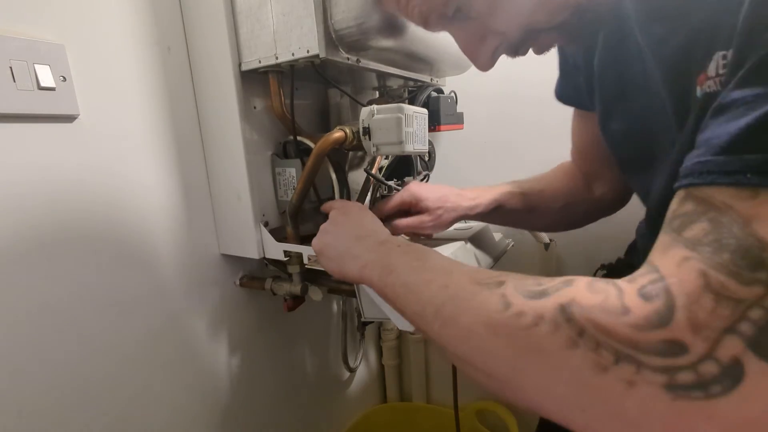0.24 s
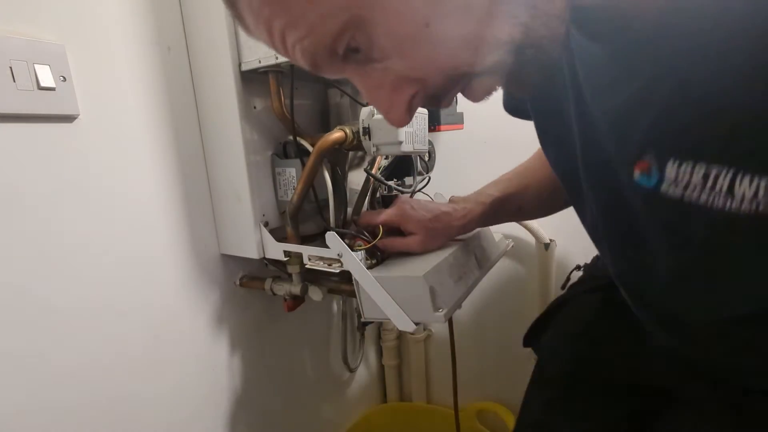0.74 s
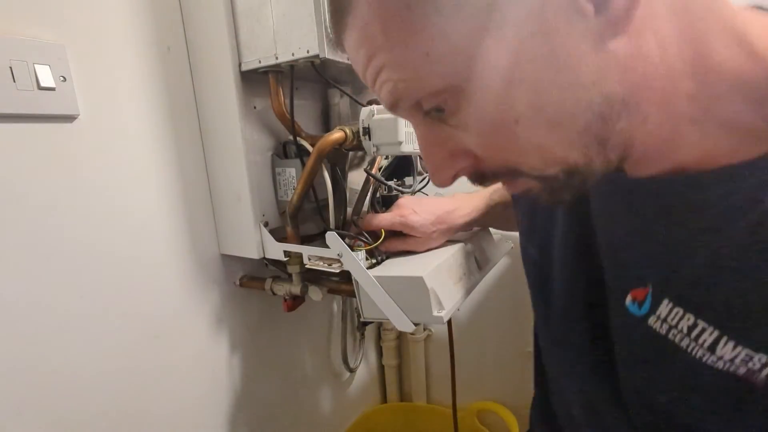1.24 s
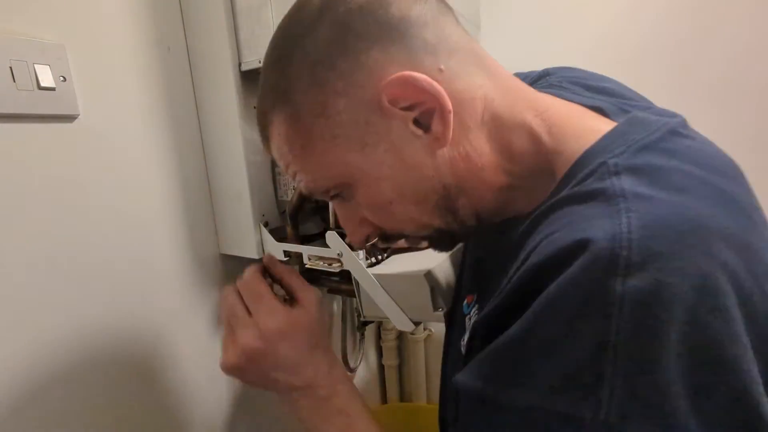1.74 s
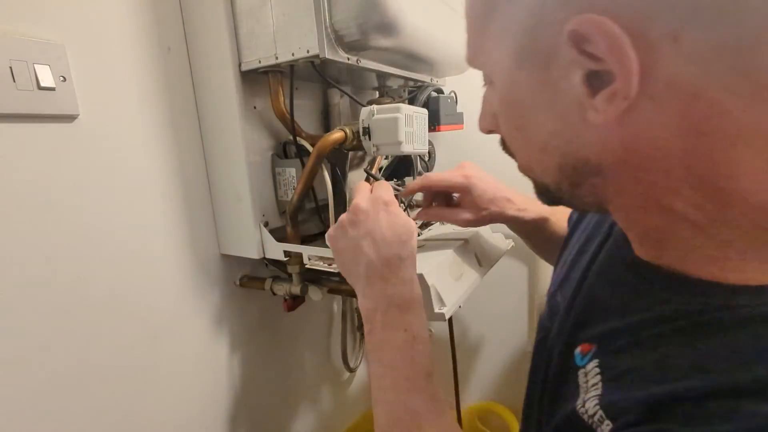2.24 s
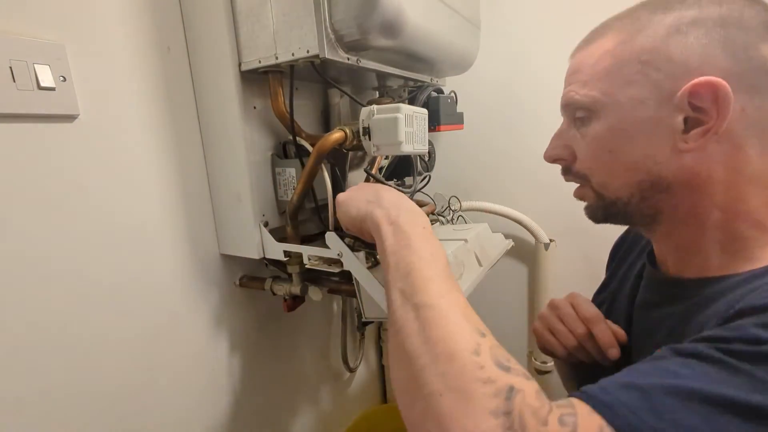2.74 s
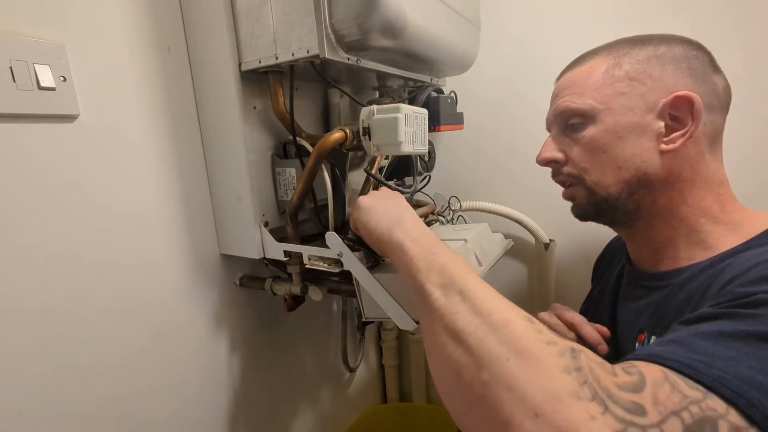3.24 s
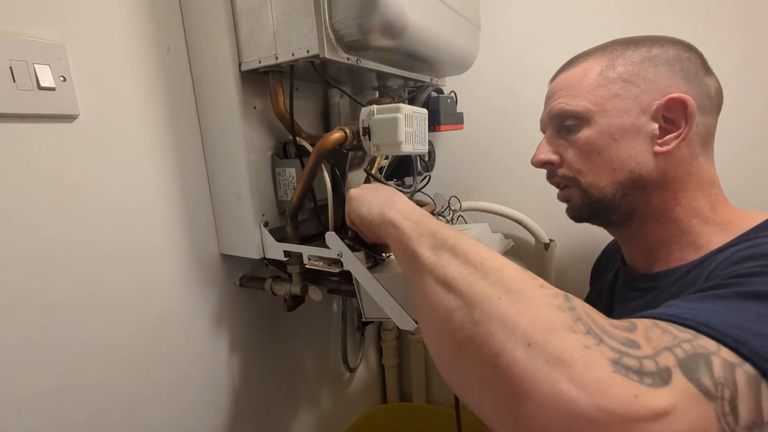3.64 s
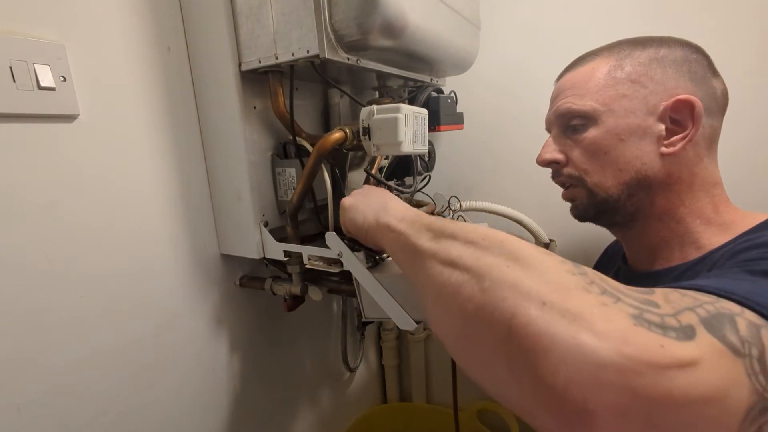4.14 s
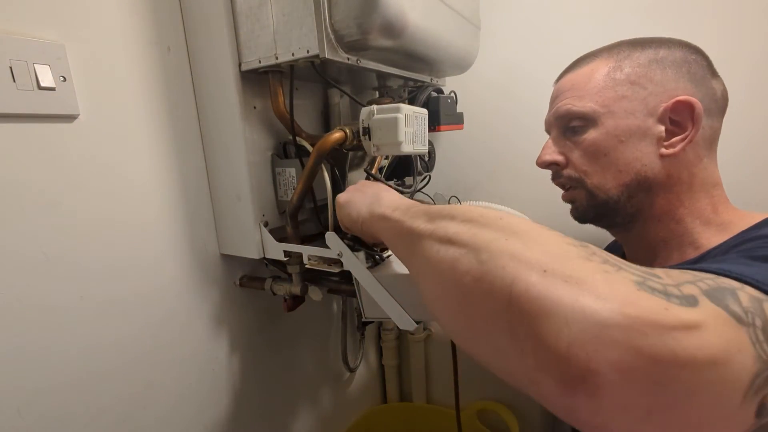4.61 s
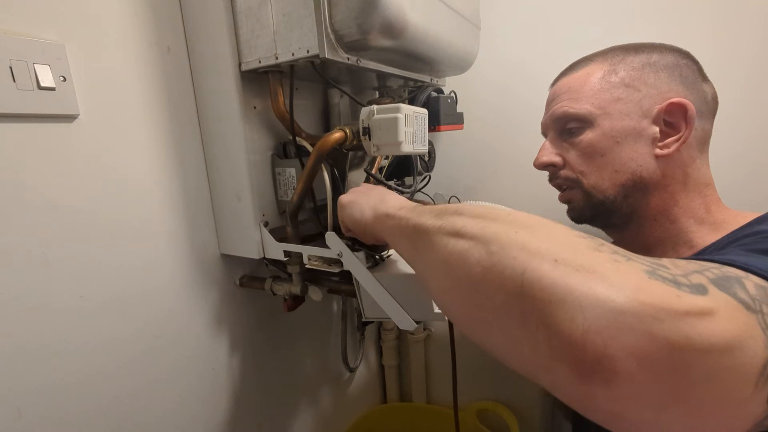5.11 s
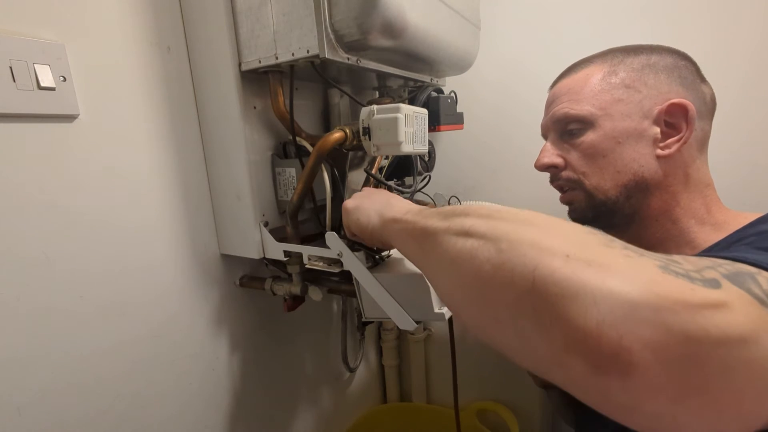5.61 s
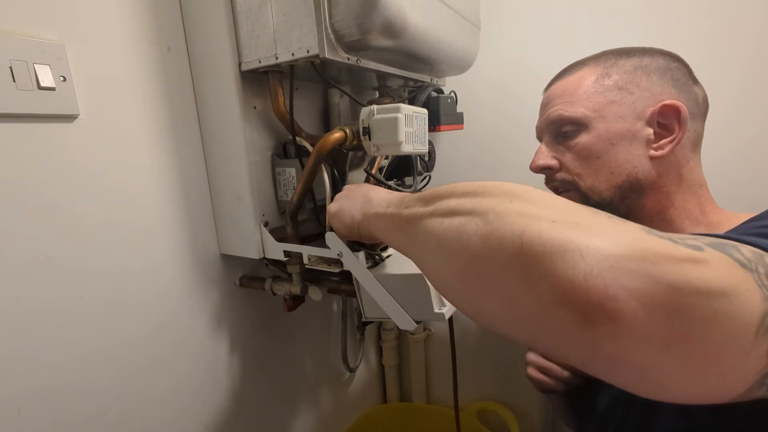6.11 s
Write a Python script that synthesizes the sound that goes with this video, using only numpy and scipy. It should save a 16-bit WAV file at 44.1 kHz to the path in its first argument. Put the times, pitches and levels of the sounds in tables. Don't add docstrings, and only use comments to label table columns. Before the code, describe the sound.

A nearby stereo microphone catches someone working on metal fittings: gritty finger rubs, dry snaps, short brassy rings. The busy first half has rustling sleeves, soft floor thuds and three panel bangs, the first by far the loudest. The second half is sparse and quiet, with tiny taps and one rapid tool rattle near the end. Noise reduction clips the tails, leaving patchy near-silence between touches.

```python
import sys
import numpy as np
from scipy import signal
from scipy.fft import rfft, irfft, next_fast_len
from scipy.io import wavfile
from scipy.ndimage import uniform_filter1d

SR = 44100
rng = np.random.default_rng(int(sys.argv[2]) if len(sys.argv) > 2 else 0)


def log_audio(samples):
    frames = np.atleast_2d(samples).T
    limited = np.clip(frames, -1, 1)
    pcm = np.round(limited * 32767).astype(np.int16)
    wavfile.write(sys.argv[1], SR, pcm)


def undo_db(level):
    steps = np.asarray(level, float) / 20
    return 10 ** steps


N = 280476


def rms_one(x):
    return x / np.sqrt(np.mean(x ** 2) + 1e-20)


def in_time(rows):
    s, *columns = np.transpose(rows)
    return [np.interp(np.arange(N) / SR, s, c) for c in columns]


def at_hz(points, hz):
    point_hz, point_db = np.array(points)[:, 0], np.array(points)[:, 1]
    return np.interp(np.log(hz), np.log(point_hz), point_db)


def sides(pan_db):
    return undo_db(np.array([[pan_db / 2], [-pan_db / 2]]))


def drift(rate):
    r = np.exp(-80 * np.pi * rate / SR)
    noise = rng.standard_normal(N // 40 + 2002)
    slow = signal.lfilter([1], [1, -2 * r, r * r], noise)[2000:]
    return np.interp(np.arange(N) / 40, np.arange(len(slow)), rms_one(slow))


def coloured(spectrum, flicker_db=0):
    # pitch_hz [Hz], side_minus_mid_db [dB]
    width_points = [(60, -24.5), (110, -13.5), (200, -14), (380, -6), (700, -3.5), (1290, 1), (2380, 0.5),
                    (4400, -1), (8120, 0.5), (15000, 0)]
    port_share = 0.18
    size = next_fast_len(N)
    hz = np.arange(1, size // 2 + 2) * SR / size
    inside = (hz > spectrum[0][0]) & (hz < spectrum[-1][0])
    mid, side = rfft(rng.standard_normal((2, size))) * undo_db(at_hz(spectrum, hz)) * inside
    side = np.sqrt(1 - port_share) * side + 1j * np.sqrt(port_share) * mid
    side = side * undo_db(at_hz(width_points, hz))
    mid_level = np.sqrt(np.mean(irfft(mid, size) ** 2))
    stereo = irfft([mid + side, mid - side], size)[:, :N]
    return stereo / mid_level * undo_db(flicker_db * drift(21.4))


def resonate(x, peaks):
    out = 0
    for k, (hz, width, level_db) in enumerate(peaks):
        r = np.exp(-np.pi * width / SR)
        gain = (-1) ** k * undo_db(level_db + 1.8 * drift(18))
        rise = [(1 - r * r) / 2, 0, (r * r - 1) / 2]
        ring = [1, -2 * r * np.cos(2 * np.pi * hz / SR), r * r]
        out = out + gain * signal.lfilter(rise, ring, x)
    return out


def swells(events, rise_db_per_s, fall_db_per_s, floor_db):
    t = np.arange(0, N + 128, 128)
    s, db = np.transpose(events)[:, :, None]
    since = t / SR - s
    power = undo_db(db + np.minimum(rise_db_per_s * since, -fall_db_per_s * since)) ** 2
    return np.interp(np.arange(N), t, np.sqrt(power.sum(axis=0) + undo_db(floor_db) ** 2))


def house():
    # pitch_hz [Hz], level_db [dB per Hz]
    rumble_tone = [(22, -39.5), (32, -12), (45, 1.5), (60, 13), (76, 4.5), (95, -21.5), (130, -30.5)]
    thud_tone = [(70, -23), (110, -3), (150, 1.5), (190, -1), (250, -9), (400, -15.5)]
    quiet_tone = [(150, -30), (250, -10), (400, -13), (460, -3), (520, -8), (1500, -15), (2500, -19),
                  (3000, -25), (4200, -29), (4800, -24), (6900, -24), (7200, -32), (12500, -33),
                  (14000, -44)]
    # start_s [s], level_db [dB]
    sways = [(0.1, -55), (0.32, -48.5), (0.49, -45), (0.67, -50), (0.8, -46), (1.03, -43), (1.17, -32.5),
             (1.43, -31.5), (1.6, -42.5), (1.74, -44), (1.93, -42.5), (2.12, -32), (2.3, -43), (2.53, -47),
             (2.83, -30.5), (3.06, -60), (3.28, -51), (3.52, -56), (3.81, -46.5), (4.14, -50),
             (4.48, -42.5), (5.01, -51), (5.35, -54.5), (5.65, -50.5), (5.93, -53.5), (6.08, -65),
             (6.33, -56)]
    # start_s [s], level_db [dB]
    steps = [(0.15, -53), (0.34, -49.5), (0.488, -45), (0.62, -55), (0.832, -53), (0.936, -39),
             (1.126, -39), (1.34, -47), (1.55, -39), (1.8, -47), (2.05, -39), (2.13, -42.5), (2.366, -47),
             (2.635, -41), (2.88, -38), (3.2, -50), (3.44, -53.5), (3.77, -56.5), (4.0, -53.5), (4.23, -54),
             (4.44, -54), (4.78, -59), (5.09, -57), (5.25, -52.5), (5.69, -49.5), (5.9, -62), (6.1, -59),
             (6.21, -55.5), (6.3, -60.5)]
    sway_gain = swells(sways, rise_db_per_s=154, fall_db_per_s=91, floor_db=-57)
    rumble = sway_gain * coloured(rumble_tone)
    step_gain = swells(steps, rise_db_per_s=190, fall_db_per_s=102, floor_db=-66)
    thuds = step_gain * coloured(thud_tone, flicker_db=1.5)
    still_room = undo_db(-71) * coloured(quiet_tone, flicker_db=1.2)
    whine_hz, whine_db = 10150, -99
    whine = undo_db(whine_db + 3 * drift(3.7)) * np.sin(2 * np.pi * whine_hz * np.arange(N) / SR)
    return rumble + thuds + still_room + whine


def movement():
    # start_s [s], effort_db [dB]
    effort = [(0.0, -32), (0.38, -8.5), (0.6, -14), (0.74, -14), (0.8, -8.5), (0.96, -1), (1.08, -4.5),
              (1.47, -1), (1.72, -2.5), (2.1, -2), (2.22, -0.5), (2.36, -5.5), (2.69, 4), (2.87, -3),
              (2.91, -8.5), (2.93, -12), (3.1, -30), (3.4, -30)]
    # pitch_hz [Hz], level_db [dB per Hz]
    shuffle_tone = [(130, -30.5), (220, 4.5), (251, -2), (463, -4), (583, -3.5), (642, -7), (877, -8),
                    (1300, -32), (1690, -34.5), (2860, -120)]
    rub_tone = [(470, -42.5), (800, -7.5), (1010, -3), (1490, -8.5), (1860, -7.5), (2290, -11), (5000, -20),
                (6500, -63), (11000, -120)]
    rustle_tone = [(2200, -13.5), (3400, 5.5), (5600, 2.5), (6400, 5.5), (8800, 5), (10500, 3.5),
                   (12000, 6.5), (14500, -4), (16400, 9)]
    effort_db, = in_time(effort)
    shuffle_db = -49.5 + 0.53 * effort_db
    rub_db = -51 + 0.87 * effort_db
    rustle_db = np.maximum(-49.5 + 1.8 * effort_db, -78.5)
    shuffle = undo_db(shuffle_db) * coloured(shuffle_tone, flicker_db=3.0)
    rub = undo_db(rub_db) * coloured(rub_tone, flicker_db=-1.5)
    rustle = undo_db(rustle_db) * coloured(rustle_tone, flicker_db=0.8)
    settling = np.clip((effort[-1][0] + 0.24 - np.arange(N) / SR) / 0.15, 0, 1)
    return (shuffle + rub + rustle) * settling


def room(x):
    t60_s, wall_cut_hz = 0.29, 1100
    size = next_fast_len(N + SR)
    w = 2 * np.pi * np.arange(size // 2 + 1) / size
    dull = 1 / (1 + 1j * w * SR / (2 * np.pi * wall_cut_hz))
    lags = rng.uniform(.006, .028, (2, 6, 1)) * SR
    loop = undo_db(-60 * lags / SR / t60_s) * dull * np.exp(-1j * w * lags)
    echoes = np.sum(loop / (1 - loop), axis=1)
    return irfft(rfft(x, size) * echoes, size)[:, :N]


def squeak():
    # start_s [s], pitch_hz [Hz], level_db [dB]
    path = [(.68, 7300, -80), (.74, 7900, -74), (.77, 8600, -69), (.785, 9400, -64), (.82, 9250, -71),
            (.855, 9200, -63), (.885, 8700, -66), (.93, 8450, -64), (.97, 8900, -66)]
    hz, level_db = in_time(path)
    wave = np.sin(2 * np.pi * np.cumsum(hz * (1 + .01 * drift(60))) / SR)
    moving = np.gradient(hz) != 0
    return undo_db(level_db - 2.5 + 4 * drift(40)) * wave * moving * sides(1.5)


def burst(s, level_db, t60, rise_s):
    t = np.maximum(np.arange(N) / SR - s, 0)
    return np.minimum(t / rise_s, 1) * undo_db(level_db - 60 * t / t60)


def tool():
    # start_s [s], level_db [dB], t60_s [s]
    tool_hits = [
        (5.672, -44, 0.1),
        (5.676, -31.5, 0.052),
        (5.681, -30, 0.028),
        (5.693, -40, 0.1),
        (5.716, -54, 0.069),
        (5.738, -67.5, 0.17),
    ]
    # pitch_hz [Hz], width_hz [Hz], level_db [dB]
    tool_modes = [(5320, 250, -14), (5850, 200, -7), (6300, 400, -14), (10500, 350, -6), (11400, 160, 9),
                  (12400, 350, 0), (12900, 400, 0), (13400, 300, -10)]
    friction = coloured([(3000, -22.0), (5000, 9.0), (13500, 10.0), (14200, -31.5)])
    chatter = rms_one(resonate(friction, tool_modes))
    return sides(-3.5) * chatter * sum(burst(s, hit_db, t60, 0.0013) for s, hit_db, t60 in tool_hits)


def strike(hits, modes, apart_s, damped_s):
    out, t = np.zeros((2, N)), np.arange(SR // 2) / SR
    turn = rng.uniform(-0.3, 1, len(modes))
    for s, hit_db, hardness_db in hits:
        at = round(s * SR)
        luck = rng.normal(0, 1, len(modes))
        for (hz, level_db, t60), k, luck_db in zip(modes, turn, luck):
            phase = 2 * np.pi * hz * (t + k * apart_s * np.array([[1], [-1]]))
            gain_db = hit_db + level_db + hardness_db * np.log2(hz / modes[1][0]) + luck_db
            wave = undo_db(gain_db - 60 * t / t60) * np.minimum(t / 0.0025, 1) * np.sin(phase)
            out[:, at:at + len(t)] += wave
    damping = np.clip((np.arange(N) / SR - damped_s) / 0.026, 0, 1)
    return out * undo_db(-10.5 * damping)


def knocks():
    # start_s [s], level_db [dB], hardness_db [dB per octave]
    first_hits = [(1.352, -13.5, 1), (1.357, -6.5, -7), (1.367, -11.5, 0.5), (1.386, -17, -21),
                  (1.413, -17.5, -25), (1.42, -24.5, 1.5), (1.434, -26, -5)]
    second_hits = [(2.0525, -23, 1.5), (2.058, -27.5, 2), (2.064, -26, -0.4), (2.07, -29.5, 2.9),
                   (2.078, -30, -4.5), (2.085, -34, -3), (2.10, -38, 1.7)]
    third_hits = [(2.699, -24, 3), (2.702, -20, -8.5), (2.708, -13, -10), (2.739, -25.5, -4),
                  (2.768, -25.5, 5), (2.779, -25, 4), (2.787, -17, 2.5), (2.806, -29.5, 8.5),
                  (2.811, -15, -5.5), (2.83, -25, -14)]
    # pitch_hz [Hz], level_db [dB], t60_s [s]
    first_modes = [(177.3, -23.5, 0.42), (224, -12, 0.0528), (249.5, -2.5, 0.35), (293.7, -11.5, 0.079),
                   (325, -0.5, 0.203), (382, -15, 0.19), (457.4, -8.5, 0.2), (583.5, -4.5, 0.1),
                   (625, -20, 0.43), (745, -19, 0.42), (816, -17, 0.087), (1010, -26.5, 0.13),
                   (1138, -33.5, 0.12), (1250, -23.5, 0.087), (1670, -26, 0.12)]
    second_modes = [(67.4, -10, 0.68), (114, -1.5, 0.11), (183, -5.5, 0.092), (313.4, -10, 0.33),
                    (378.4, -7.5, 0.17), (600, 3.5, 0.018), (733, -8.5, 0.092), (1070, -43, 0.1),
                    (1106, -9.5, 0.1), (1630, -22, 0.087), (2020, -19, 0.12)]
    third_modes = [(77, -27.5, 0.56), (191.5, -0.5, 0.12), (224.4, -4, 0.15), (316.8, -8, 0.25),
                   (417.4, -5, 0.077), (567.4, -7.5, 0.069), (650, -8.5, 0.078), (713, -18, 0.39),
                   (850, -10.5, 0.035), (1160, -22, 0.042)]
    first = sides(-4.0) * strike(first_hits, first_modes, apart_s=0.00018, damped_s=1.442)
    second = sides(-1.1) * strike(second_hits, second_modes, apart_s=0.00009, damped_s=2.25)
    third = sides(-0.72) * strike(third_hits, third_modes, apart_s=0.00024, damped_s=2.87)
    return first + second + third


def ticks():
    # start_s [s], peak_db [dB], low_hz [Hz], high_hz [Hz], left_minus_right_db [dB]
    snaps = [(0.6525, -53, 4000, 16000, 1), (1.3505, -31, 3500, 12000, -1), (1.8672, -36, 2700, 6400, 1),
             (1.869, -37, 2700, 5000, 1), (2.0582, -37, 900, 4800, 0), (2.6512, -31, 900, 12000, 0),
             (2.7181, -38, 2400, 6500, 0), (3.4615, -51.5, 2700, 7600, -3), (3.553, -70, 5500, 7600, 1),
             (3.7087, -51, 2500, 15000, 0), (3.9466, -50, 2860, 4840, -2), (3.9466, -54, 2700, 7800, -2),
             (4.182, -63, 1500, 5000, 0), (4.491, -64, 5000, 6700, -3), (4.563, -71, 3200, 9000, -2),
             (4.722, -70, 5600, 6800, 0), (5.6378, -55, 1400, 9000, 0), (3.281, -60, 600, 5000, 0),
             (3.775, -58, 600, 5000, 0), (3.1815, -56, 600, 14000, 0), (6.055, -64, 800, 5000, 0),
             (6.19, -65, 1400, 7000, 0) ]
    white = coloured([(1000, 0.0038), (14000, 0.0078)])
    out, t = np.zeros((2, N)), np.arange(SR // 20) / SR
    shape = np.minimum(t / .001, 1) * undo_db(8 - 60 * t / .014)
    for s, peak_db, low_hz, high_hz, pan_db in snaps:
        span = slice(round(s * SR), round(s * SR) + len(t))
        band = signal.butter(5, [low_hz, high_hz], "band", fs=SR, output="sos")
        out[:, span] += sides(pan_db) * undo_db(peak_db) * signal.sosfilt(band, white[:, span] * shape)
    return out


def pings():
    # start_s [s], pitch_hz [Hz], level_db [dB], t60_s [s]
    rings = [(.056, 960, -45, 0.22), (.053, 6260, -59, 0.049), (.144, 980, -56.5, 0.13),
             (.144, 1290, -54.5, 0.15), (.594, 1000, -47.5, 0.17), (.594, 1870, -43, 0.1),
             (.78, 509, -40, 0.28), (.88, 2410, -49.5, 0.15), (.985, 890, -40, 0.091),
             (.985, 1796, -45, 0.13), (1.292, 2390, -46, 0.16), (1.292, 4250, -45, 0.087),
             (1.85, 826, -41, 0.23), (1.85, 1930, -48, .08), (2.054, 4100, -45, .1),
             (2.054, 1834, -38, 0.2), (2.059, 912, -20, 0.044), (2.652, 1010, -27.5, 0.083),
             (2.654, 1230, -28, 0.11), (2.66, 1412, -32.5, 0.21), (2.652, 3830, -31, 0.067),
             (2.68, 4060, -34.5, 0.07), (2.696, 4080, -37, .05), (2.719, 3980, -36, 0.064),
             (2.652, 9450, -48, .08), (2.652, 10800, -42, 0.049), (2.713, 2690, -42, 0.24),
             (3.27, 5100, -73, .15), (3.772, 2330, -51.5, 0.058), (3.706, 6104, -53.5, .07),
             (4.405, 3550, -56.5, 0.088), (4.405, 6550, -52, 0.079), (4.563, 3680, -52.5, 0.04),
             (5.04, 1940, -49.5, 0.099), (5.04, 2460, -54, 0.072), (5.066, 3600, -50.5, .07),
             (5.07, 9500, -56, 0.099), (5.156, 1930, -53, 0.059), (5.156, 3730, -54, .07),
             (5.164, 553, -45, 0.28), (5.272, 3760, -74, 0.17), (5.468, 778, -50, 0.11),
             (5.638, 9990, -73, 0.22), (5.646, 1668, -47, 0.03), (5.655, 875, -52, 0.16),
             (5.737, 3580, -58, 0.11), (5.82, 966, -54.5, 0.14), (5.82, 1915, -55, 0.14),
             (5.82, 9453, -76, 0.18), (6.191, 3700, -65, .07)]
    out, t = np.zeros((2, N + SR)), np.arange(SR // 8) / SR
    for s, hz, level_db, t60 in rings:
        wobble_s = np.arange(130) * np.clip(5 / hz, .001, .005)
        wobble = np.interp(t, wobble_s, rng.standard_normal(130))
        apart = rng.uniform(-1, 1) * min(hz / 1200, 1.0) * np.array([[1], [-1]])
        phase = 2 * np.pi * hz * t + apart + wobble
        gain = np.minimum(t / 0.00073, 1) * undo_db(level_db - 60 * t / t60 + 4.5 * wobble)
        at = round(s * SR)
        out[:, at:at + len(t)] += gain * np.sin(phase)
    return out[:, :N]


def strokes(events, t60, heard_s, grit_heard_s, rise_s, early_s):
    t, power = np.arange(SR // 4) / SR, np.zeros((4, N + SR))
    for s, brass_db, casing_db, grit_db in events:
        at = round((s - early_s) * SR)
        sheen_db = grit_db + 0.5 + 0.43 * (grit_db - brass_db)
        dry_s = grit_heard_s * max(1.05 + .03 * (grit_db + 46), .5)
        brief = np.clip(1 + .07 * (brass_db + 47), .27, 1)
        slower_s = .0006 * np.clip(-40 - brass_db, 0, 12)
        parts = [(casing_db, .004, 1.4, 2.0 * heard_s),
                 (brass_db, .0006, 1.05, heard_s),
                 (grit_db, .0003, .9, dry_s),
                 (sheen_db, .0003, .7, .8 * dry_s)]
        for k, (level_db, late_s, lasts, open_s) in enumerate(parts):
            top_s = rise_s + late_s + slower_s * (k < 2)
            closing = 1 / (1 + (t / (top_s + brief * open_s)) ** 10)
            fall_db = 60 * np.maximum(t - top_s, 0) / (lasts * t60)
            shape = np.minimum(t / top_s, 1) ** 0.24 * undo_db(level_db - 5.5 - fall_db) * closing
            power[k, at:at + len(t)] += shape ** 2
    return power[:, :N]


def scuffs():
    # start_s [s], brass_db [dB], casing_db [dB], grit_db [dB]
    contacts = [(0.055, -46, -40, -53), (0.1425, -47, -64, -42), (0.3395, -65.5, -43, -51),
                (0.5935, -39.5, -37.5, -44.5), (0.6535, -62, -58, -50), (0.7784, -51.5, -36, -49),
                (0.8404, -48, -66, -60), (1.038, -72, -43, -49.5), (1.1194, -37.5, -34.5, -36.5),
                (1.2906, -38.5, -41.5, -41), (1.3498, -35, -18.5, -23), (1.847, -30.5, -29, -35),
                (2.0525, -25, -20.5, -31.5), (2.62, -62, -38, -55.5), (2.6523, -19.5, -50, -19.5),
                (2.6985, -40, -22, -38), (3.18, -50.5, -41.5, -52.5), (3.278, -58.5, -51.5, -72),
                (3.316, -67, -61, -90), (3.3285, -56, -53, -62), (3.7057, -46, -49.5, -41),
                (3.8325, -60, -54.5, -69), (3.8712, -54.5, -54.5, -50), (4.06, -56, -54.5, -66),
                (5.736, -50, -57.5, -56), (5.762, -57, -62, -63), (5.856, -58, -51, -72),
                (4.337, -58, -44, -76), (4.4015, -38.5, -39.5, -44), (5.039, -46.5, -46, -70.5),
                (5.0633, -43.5, -44.5, -49.5), (5.1545, -38.5, -40, -47.5), (5.265, -47.5, -51, -63),
                (5.273, -55, -55, -63), (5.467, -54, -56, -67), (5.8165, -50.5, -48.5, -62),
                (6.055, -56.5, -50, -80), (6.189, -57, -55.5, -68)]
    rubs = [(0.2334, -75, -65, -64), (0.355, -50, -57, -44.5), (0.4767, -44.5, -38, -42.5),
            (0.929, -39, -38.5, -40.5), (0.9844, -45.5, -59, -40), (1.1844, -48, -71, -44),
            (1.3746, -26, -15, -27), (1.508, -33, -31, -32.5), (1.7404, -42, -36.5, -52),
            (1.9314, -48, -33.5, -39), (1.98, -47, -34, -37.5), (2.2674, -52, -70, -37),
            (2.359, -41.5, -36.5, -67), (2.715, -33, -40, -34.5), (2.7594, -29.5, -21, -31),
            (2.8, -36.5, -30.5, -37), (2.995, -49.5, -47, -65), (3.02, -54, -60, -58.5),
            (3.4064, -69.5, -69, -83), (3.769, -50.5, -43.5, -57.5), (3.993, -60.5, -52.5, -68),
            (4.103, -67, -69, -65), (4.155, -75, -54, -75.5), (4.18, -52, -44.5, -62),
            (4.368, -48.5, -44, -62), (1.0, -60, -54, -70), (1.08, -62, -39.5, -70), (1.89, -54, -38, -60),
            (2.02, -52, -50, -60), (2.42, -48, -40, -60), (2.48, -60, -49, -60), (2.55, -45, -41, -57.5),
            (5.5614, -66, -60, -86), (5.6, -71, -52.5, -83), (5.642, -60, -61, -65),
            (5.654, -46.5, -61, -44), (5.69, -53, -47, -44.5), (5.3, -74, -62, -72),
            (4.53, -74.5, -57.5, -86), (6.2344, -74, -81.5, -71)]
    # pitch_hz [Hz], width_hz [Hz], level_db [dB]
    hollow_modes = [(188, 32, 11.5), (338, 250, 6), (577, 92, 6), (667.5, 82, 3), (903, 82, -1.5)]
    brass_modes = [(980, 130, -6.5), (1782, 27, 5.5), (1880, 49, -4), (2390, 30, 5.5), (2720, 660, -24),
                   (3730, 160, 5.5), (5400, 240, -13)]
    power = strokes(contacts, t60=0.17, heard_s=0.083, grit_heard_s=.026, rise_s=0.0045, early_s=0.001)
    power = power + strokes(rubs, t60=0.19, heard_s=0.16, grit_heard_s=.05, rise_s=0.022, early_s=0.018)
    casing, brass, grit, sheen = np.sqrt(power)
    low = coloured([(130, -21.5), (250, -10.5), (500, -4.5), (1000, -5.5), (1800, -14.5)], flicker_db=0.5)
    mid = coloured([(600, -19), (1000, 0), (2500, -1.5), (5500, -14.5), (9000, -39.5)], flicker_db=-1.5)
    low = low + undo_db(4.0) * resonate(low, hollow_modes)
    mid = mid + undo_db(3.0) * resonate(mid, brass_modes)
    high = coloured([(2500, -11.5), (4000, -1.5), (6500, -0.5), (10000, -24.0), (16400, -38.5)])
    top = coloured([(5000, -23.5), (8000, 5.5), (12000, 6.5), (16400, -7.5)])
    scratch = undo_db(-7.0) * (grit * rms_one(high) + sheen * rms_one(top))
    return casing * rms_one(low) + brass * rms_one(mid) + scratch


def scene():
    panel = knocks()
    echo = undo_db(-17.0) * room(panel)
    background = house() + movement()
    return background + squeak() + tool() + panel + echo + ticks() + pings() + scuffs()


def noise_reducer(x, depth, keep_db):
    cells = signal.stft(x, nperseg=1024)[2]
    power = uniform_filter1d(np.abs(cells) ** 2, size=3, axis=1) + 1e-16
    around = uniform_filter1d(uniform_filter1d(power, size=25, axis=1), size=3, axis=2)
    return undo_db(keep_db) * signal.istft(cells * (power / around) ** depth, nperseg=1024)[1][:, :N]


def band_limit(x):
    return signal.sosfilt(signal.butter(12, 16830, fs=SR, output="sos"), x)


def record(dry):
    cleaned = noise_reducer(dry, depth=.18, keep_db=-.8)
    rounded = 1.3 * np.tanh(cleaned / 1.27)
    top_cut = signal.cheby2(14, 50, 16050, fs=SR, output="sos")
    finished = signal.sosfilt(top_cut, rounded)
    return band_limit(finished)


dry = scene()
out = record(dry)
log_audio(out)
```